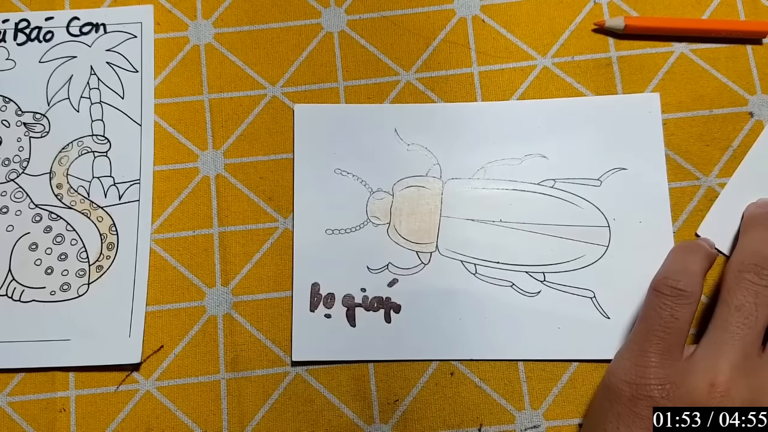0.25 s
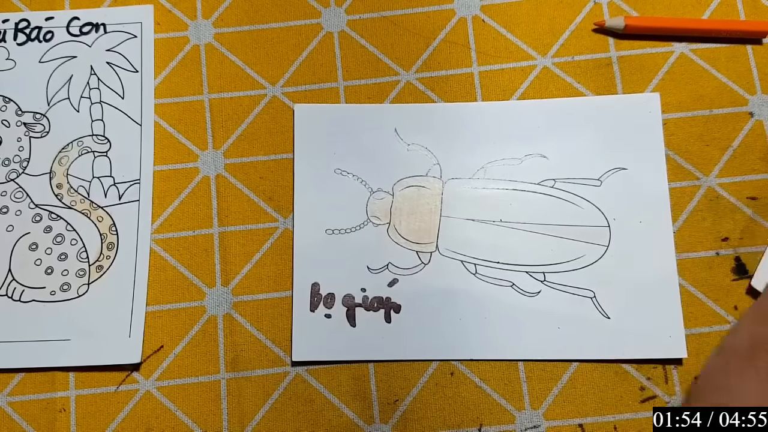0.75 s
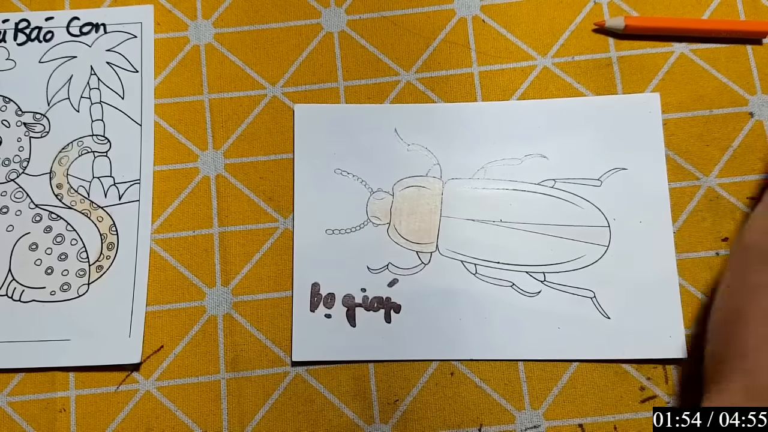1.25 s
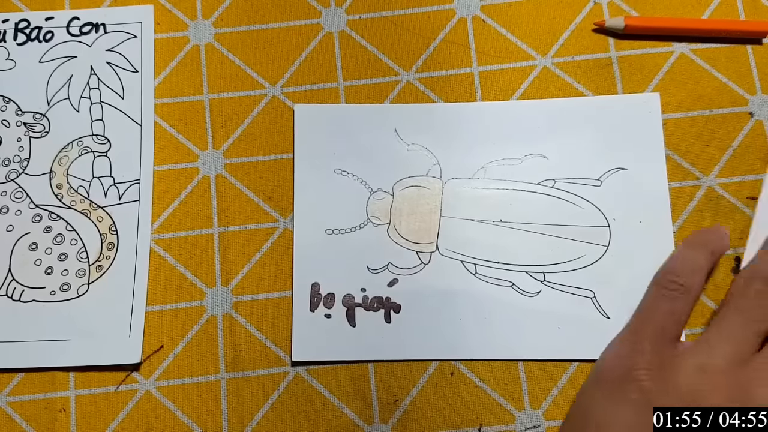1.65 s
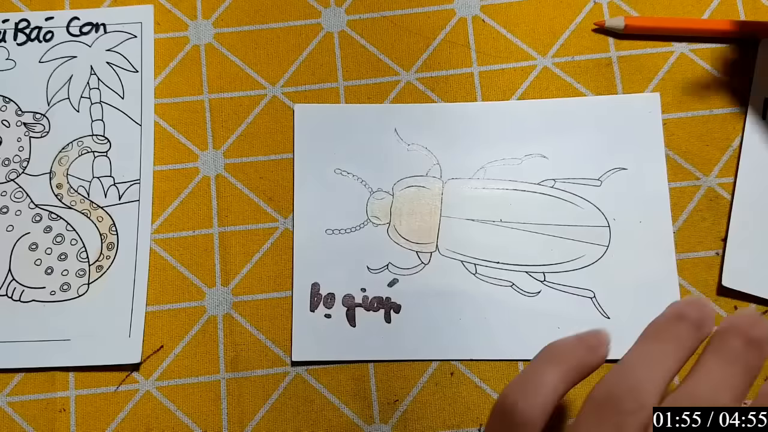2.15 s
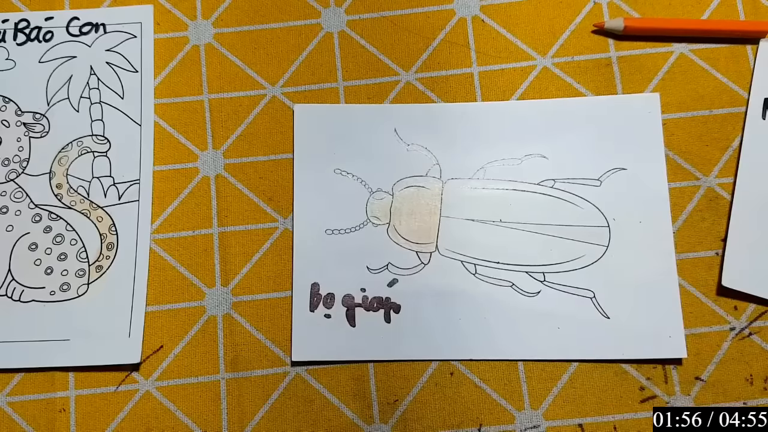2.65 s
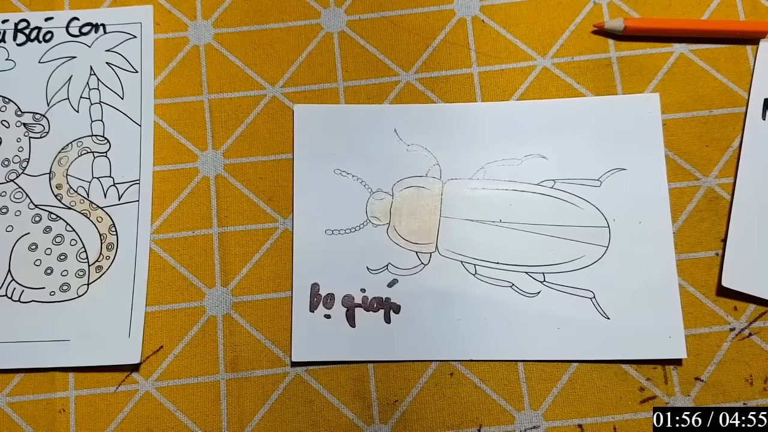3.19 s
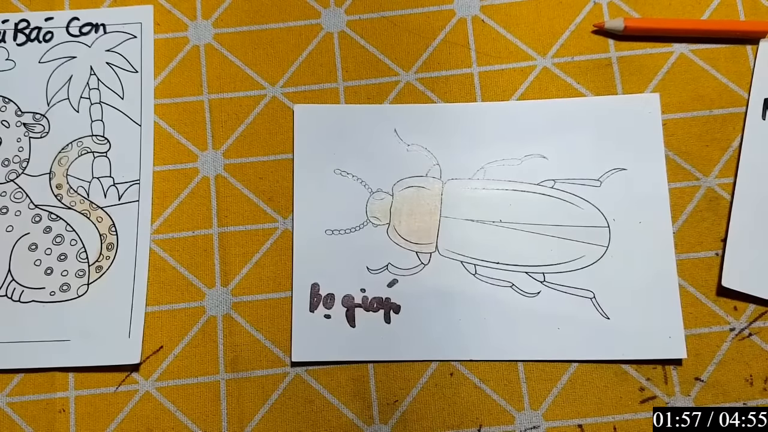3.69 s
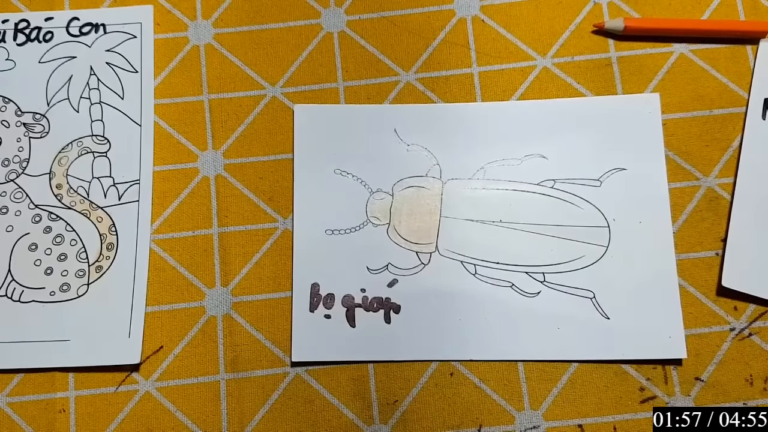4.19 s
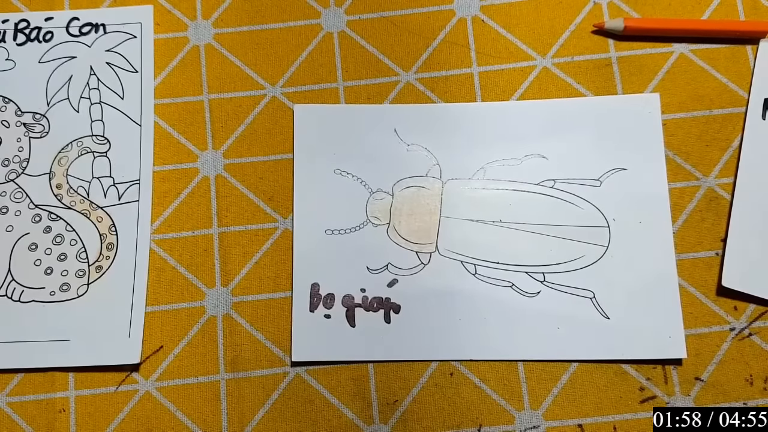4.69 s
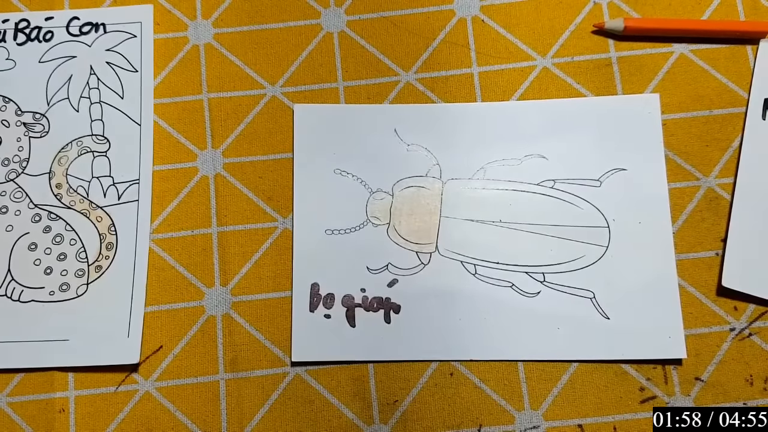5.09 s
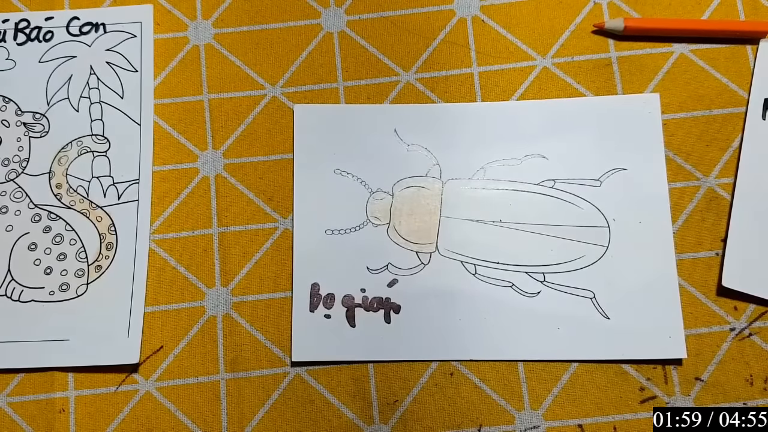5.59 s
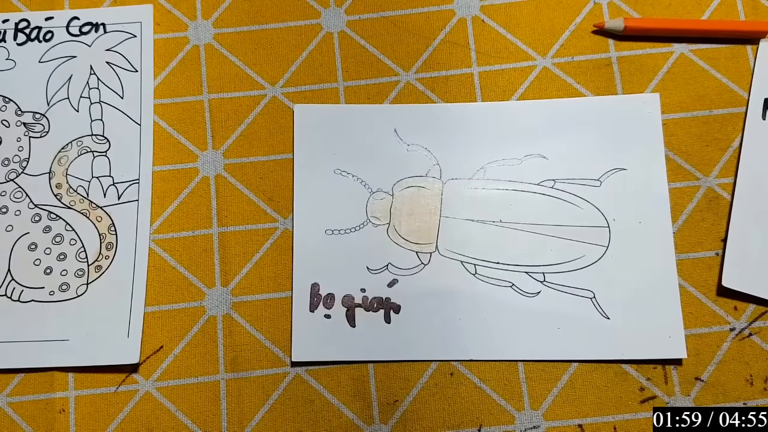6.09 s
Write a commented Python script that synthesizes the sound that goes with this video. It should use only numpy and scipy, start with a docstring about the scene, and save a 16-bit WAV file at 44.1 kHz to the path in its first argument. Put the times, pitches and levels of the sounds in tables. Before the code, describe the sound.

A close stereo microphone over a cloth-covered table in a bare, resonant room, with a low dull rush beneath. From 0 to 1.1 seconds, wood scrapes and groans faintly in a low hollow tone while paper swishes lightly on the right, with a snap and soft thump at 0.6 and clicks near 1.05. A small tick at 1.4, then near quiet. At 2.2 a crisp wooden clack, another at 2.3; around 2.6 to 2.8 a stronger hollow scrape and short groan with knocks. At 3.3 a deep soft thump. At 4.1 a hard, loud knock with thump and paper stroke, then calmer rubbing. From 5.2 knocks and scrapes crowd together, a loud paper sweep peaks at 5.7, and heavy clattering knocks land near 6.1. Abrupt tenth-second dropouts come at about 0.5, 1.75, 3.0, 4.25 and 5.5.

```python
"""Wood scrapes and groans as things are pushed aside, while paper hisses and snaps over a cloth-covered table.
The hand thumps the cloth, wooden things knock, and it is all heard close up in stereo in a bare room.
Rubbing is noise made of tiny slips, knocks and snaps are dying noise bursts, thumps are decaying tones,
and the groan is wavering sines. The sound drops out for a tenth of a second at a steady beat."""
import sys
import numpy as np
from scipy import signal
from scipy.fft import rfft, irfft, next_fast_len
from scipy.io import wavfile
from scipy.ndimage import map_coordinates

SR = 44100
rng = np.random.default_rng(int(sys.argv[2]) if len(sys.argv) > 2 else 0)


def put_to_file(sound):
    """Save the sound as 16-bit audio at rate SR, in the file named by the first command-line argument."""
    columns = np.atleast_2d(sound).T  # one column per channel
    safe = np.clip(columns, -1, 1)
    whole_steps = np.round(safe * 32767)
    wavfile.write(sys.argv[1], SR, whole_steps.astype(np.int16))


N = 279946

# things pushed over wood: peak_s, body_level_db, rise_s, fall_s, scrape_over_body_db
WOOD_DRAGS = [(.02, -47.5, 0.302, 0.33, 4.5), (.28, -37.5, .6, 0.57, -14), (.62, -45.5, 0.17, .3, -5),
              (.8, -48, .12, .12, -1.5), (1.07, -46, 0.25, 0.19, 2.5), (2.3, -47.5, 0.69, .6, -7),
              (2.62, -26, 0.07, 0.34, -3.5), (2.709, -25, 0.18, 0.3, -4.5), (3.1, -40, .3, 0.72, -7),
              (3.36, -35.5, 0.068, 0.38, -8.5), (3.87, -53.5, 0.19, 1, 10.5), (4.149, -30, 0.16, 0.31, 1),
              (4.38, -35, 0.24, 0.41, -1), (4.85, -43.5, 0.22, 0.21, 3.5), (5.27, -37.5, 0.31, 0.45, 3),
              (5.355, -27.5, 0.031, 0.43, 0), (5.648, -28.5, 0.19, 0.28, 5.5), (5.87, -30, 0.14, 0.24, 0.5),
              (6.2, -32, 0.22, 0.56, -0.5)]
# slow pushes under which the wood sings: peak_s, level_db, rise_s, fall_s
GROAN_PUSHES = [(.12, -39.5, 0.54, 0.32), (.32, -42.5, 0.29, 0.88), (2.6, -35.5, 0.087, 0.23),
                (2.73, -31, .15, .33)]
# hollow tones of slowly rubbed wood: pitch_hz, waver_hz, relative_level_db
HOLLOW_TONES = [(273, 12, 0.5), (375.5, 18, -6)]
# strokes of paper over cloth and paper: peak_s, level_db, rise_s, fall_s
PAPER_SLIDES = [(.29, -55.5, .08, .6), (.56, -43.5, 0.33, 0.3), (.72, -41, 0.14, .12),
                (.8, -35.5, 0.078, .09), (.94, -37.5, 0.065, .09), (1.07, -35, .12, 0.11),
                (1.55, -46, 0.32, 0.2), (2.23, -53, .04, .4), (2.77, -39.5, .38, .4), (3.3, -55, .9, 1.1),
                (3.86, -42.5, 0.14, .6), (4.09, -30.5, .18, 0.15), (4.53, -43, 0.51, 0.21),
                (4.84, -39.5, 0.18, 0.26), (5.13, -42, 0.16, 1.6), (5.35, -28.5, 0.023, 0.17),
                (5.67, -19.5, .17, 0.22), (5.955, -33, .05, 0.13), (6.19, -31.5, 0.1, 0.2)]
# presses of the arm that set the table shaking: peak_s, level_db, fall_s
ARM_PRESSES = [(.65, -51, .6), (.92, -50.5, .45), (2.7, -35.5, .4), (3.36, -34, 0.31), (4.13, -36, .3),
               (4.43, -43.5, .4), (4.87, -42, 0.28), (5.25, -35, 2.5), (5.89, -30.5, 0.42),
               (6.21, -31.5, .7)]
# decaying low or middle tones of hand and paper stack thumping the cloth; rows close together
# can belong to one blow: start_s, level_db, pitch_hz, t60_s
THUMP_TONES = [(.615, -26.5, 143, 0.052), (.776, -32.5, 67.7, 0.16), (1.054, -25, 213.5, 0.16),
               (2.204, -37, 221, 0.069), (3.324, -19, 177.3, 0.28), (3.328, -20.5, 268, 0.17),
               (3.452, -32.5, 199.7, .3), (4.107, -19, 245.3, 0.28), (4.114, -27, 56, .3),
               (4.121, -17.5, 162, 0.15), (4.191, -22, 302, .091), (4.833, -27, 169, 0.11),
               (5.158, -23, 105, 0.13), (5.201, -29.5, 175, 0.51), (5.39, -22, 172, 0.15),
               (5.861, -29.5, 241, 0.17), (6.128, -27.5, 185, 0.3), (6.13, -11, 507, 0.058)]
# paper edges snapping and light things clicking:
# start_s, level_db, ring_hz, ring_width_hz, bright_crack_db, t60_s, room_db, left_over_right_db
EDGE_SNAPS = [(.615, -17.5, 3740, 1794, -14, .0068, -19, -11),
              (1.026, -31.5, 4200, 4000, -5, .01, -10.5, 3.5),
              (1.069, -23.5, 8100, 4120, -9, 0.03, -12.5, -2),
              (1.0733, -19, 8700, 2970, 3, .012, -10.5, -6.5),
              (1.407, -33.5, 3140, 1500, -13.5, .008, -13, -4),
              (1.4136, -22, 3400, 2200, -7.5, 0.0069, -16, -6),
              (2.2033, -15.5, 8870, 1104, -11.5, 0.023, -14.5, 3.5),
              (2.3055, -21, 5260, 1100, -12.5, .014, -12, 2.5),
              (3.492, -38, 4000, 3960, -12.5, .022, -0.5, 1), (4.571, -33, 2360, 1000, -21, .04, -4, 2),
              (5.49, -32.5, 6980, 6040, -3.5, .048, -5, -2.5), (5.505, -22, 5000, 6130, -3.5, .02, -14, -4),
              (5.885, -25.5, 5920, 4940, -18, .015, -10, -.5),
              (5.952, -24.5, 8980, 5930, -7, 0.018, -12, 1), (6.0455, -9.5, 2190, 1770, -44, .012, 3, -2),
              (6.132, -18, 2220, 1516, -30.5, 0.027, 5, .5)]
# hard contacts on wood:
# start_s, level_db, low_body_db, dull_above_hz, own_ring_hz, own_ring_db, t60_s, left_over_right_db
HARD_KNOCKS = [(2.1992, -18, 5, 5000, 447, 5.5, 0.013, 2), (2.2033, -13.5, -0.5, 3570, 1100, -7, .03, 1),
               (2.2123, -20, -3, 3200, 2400, -0.5, 0.044, 4), (2.3056, -23, -2, 9000, 800, 5, .016, -5),
               (2.632, -24, -2, 3000, 520, 7.5, .03, 0.5), (2.697, -15.5, 6, 2500, 880, 0, 0.037, 7),
               (3.321, -32, 10, 1700, 302, 1, 0.042, 1.5), (3.455, -31, 1, 1500, 888, 10.5, 0.15, 1.5),
               (4.096, -5, 4, 12250, 704, 2, 0.0051, 0), (4.099, -7.5, 0.5, 7000, 688, 2, 0.016, 1),
               (4.111, -17, 0, 2950, 920, 12.5, 0.084, -2), (4.119, -19, -0.5, 2500, 318, 12.5, 0.05, 8.5),
               (5.198, -17, 3.5, 3000, 1790, 3.5, 0.028, -5.5), (5.21, -23.5, -4.5, 3000, 860, 7, .058, 7),
               (5.263, -24, -11, 8000, 855, 10, 0.11, -3.5), (5.341, -18.5, 1, 6060, 780, 6.5, 0.058, -2.5),
               (5.397, -15.5, -2, 5030, 770, 15.5, .024, -2), (5.863, -21.5, -18, 3000, 312, 13, .05, -5),
               (6.128, -12.5, 4.5, 4490, 489, 4, .055, 4.5), (6.1321, -5.5, 0, 7500, 1980, 3, .04, -3),
               (6.145, -10.5, -16.5, 6000, 2080, 4, 0.029, 7)]
# modes of the struck wood: pitch_hz, width_hz, relative_level_db
WOOD_MODES = [(211, 50, 4), (488, 160, 2), (795, 340, 1), (1360, 460, 4), (2000, 530, 2.5),
              (3480, 1800, -1.5), (8000, 6100, -7)]

# noise colours of paper hiss, hollow body, dry scrape, shaking table and room: frequency_hz, density_db (per Hz)
PAPER_COLOUR = [(500, -36.5), (1200, -15), (2500, -0.5), (4500, 2), (7000, -2), (9200, 0), (10300, -9),
                (13500, -6.5), (16000, -16)]
BODY_COLOUR = [(70, -31.5), (140, -1.5), (220, -0.5), (290, 1), (400, -5), (550, -5), (800, -7.5),
               (1100, -11.5), (2000, -38)]
SCRAPE_COLOUR = [(500, -18), (850, -4), (1300, -2), (2100, 0.5), (2800, -2.5), (4000, -10), (7000, -32.5),
                 (14000, -39.5)]
SHAKE_COLOUR = [(15, -7.5), (30, -14), (62, -1.5), (90, -7), (125, -8), (200, -20), (500, -70)]
ROOM_TONE_COLOUR = [(25, -11), (60, -1), (120, -2), (240, -4), (450, -13.5), (800, -25), (1150, -17),
                    (1320, -9), (1550, -19.5), (2600, -20.5), (5000, -23), (9300, -34.5), (10500, -35.5),
                    (16000, -42)]
# stereo width of sound spread by the room: frequency_hz, side_over_mid_db
STEREO_WIDTH = [(30, -16), (125, -13), (250, -10.5), (500, -6.5), (1000, -1), (12000, 1)]
# decay of the room: frequency_hz, t60_s
ROOM_DECAY = [(150, .55), (600, 0.66), (2200, 0.75), (5000, 0.72), (12000, 0.35)]
# the beat of the dropouts: first_s, period_s, length_s
DROPOUT_BEAT = (.4925, 1.2538, .1012)

SWELL_DB = 20  # the rise and fall times of a stroke each span this many dB
PRESS_RISE_S = 0.15
# floor between strokes, while the hands keep shifting
REST_HISS_DB, REST_BODY_DB, REST_SCRAPE_DB, REST_SHAKE_DB = -62.5, -55, -57.5, -53.5
KNOCK_ROOM_DB = -4
TOP_HZ = 16100  # nothing passes above this


def amp(db):
    """Decibels to gain."""
    return 10 ** (np.asarray(db) / 20)


def unit(x):
    """Scaled to rms 1."""
    return x / np.sqrt(np.mean(x ** 2) + 1e-20)


def along(points, hz):
    """A (frequency, value) curve read on a log frequency axis."""
    f, v = np.transpose(points)
    return np.interp(np.log(hz + 1), np.log(f + 1), v)


def curves(rows):
    """One value per sample for each column after the time."""
    s, *columns = np.transpose(rows)
    return [np.interp(np.arange(N) / SR, s, column) for column in columns]


def wobble(rate):
    """A smooth random curve with this many knots a second."""
    knots = rng.standard_normal(int(N * rate / SR) + 4)
    return map_coordinates(knots, [np.arange(N) * rate / SR])


def filtered(x, response):
    """x shaped by a complex response of frequency."""
    n = x.shape[-1]
    padded = next_fast_len(n + 2048, real=True)
    spectrum = rfft(x, padded) * response(np.fft.rfftfreq(padded, 1 / SR))
    return irfft(spectrum, padded)[..., :n]


def resonance(f, hz, width):
    """Causal response of one mode."""
    return 1j * f * width / (hz * hz - f * f + 1j * f * width)


def power_gain(response):
    """The rms gain of a response for white noise."""
    return np.sqrt(np.mean(np.abs(response(np.linspace(0, SR / 2, 2048))) ** 2))


def spread(pair):
    """Two unrelated signals to left and right: alike in the bass, unrelated in the treble."""
    def shares(f):
        angle = np.arctan(amp(along(STEREO_WIDTH, f)))
        return np.array([np.cos(angle), np.sin(angle)])
    mid, side = filtered(pair, shares)
    return np.array([mid + side, mid - side])


def panned(pair, pan_db):
    """Left made louder than right by pan_db."""
    left_gain = np.atleast_1d(amp(pan_db / 2))
    right_gain = np.atleast_1d(amp(-pan_db / 2))
    return pair * np.array([left_gain, right_gain])


def add(track, s, sound):
    """Mix a sound into the track at time s."""
    part = track[:, round(s * SR):][:, :sound.shape[-1]]
    part += sound[..., :part.shape[1]]


def strokes(rows, rest_db):
    """Gain of strokes that swell to a peak and die away; overlapping ones add in power."""
    t = np.arange(0, N, 32) / SR
    power = amp(rest_db) ** 2
    for peak_s, db, rise, fall in rows:
        away = np.maximum((peak_s - t) / rise, (t - peak_s) / fall)
        power = power + amp(db - SWELL_DB * away) ** 2
    return np.interp(np.arange(N) / SR, t, np.sqrt(power))


def friction(spectrum, grain_db, grain_rate):
    """Stereo rubbing of rms 1: tiny slips of uneven strength, coloured by what they shake."""
    slips = rng.standard_normal((2, N)) * amp(grain_db * wobble(grain_rate))
    return unit(filtered(spread(slips), lambda f: amp(along(spectrum, f))))


def burst(t60):
    """A tenth of a second holding one dying burst of stereo noise."""
    t = np.arange(SR // 10) / SR
    return spread(rng.standard_normal((2, len(t))) * amp(-60 * t / t60))


def in_room(x, room_db):
    """x followed by the room's answer, each frequency dying at its own speed."""
    hz, t, noise = signal.stft(rng.standard_normal((2, SR * 3 // 4)), SR, nperseg=256)
    decay = amp(-60 * t / along(ROOM_DECAY, hz)[:, None])
    tail = signal.istft(noise * decay, SR, nperseg=256)[1]
    tail *= 1 - np.exp(-np.arange(tail.shape[1]) / SR / 0.00054)  # soft onset
    response = amp(room_db) * spread(tail) / np.linalg.norm(tail[0])
    response[:, 0] += 1  # the direct sound
    return signal.fftconvolve(x, response, axes=1)


def near_walls(x, echo_db, count):
    """A few close surfaces return weak copies within 12 ms and ripple the spectrum."""
    delays = rng.uniform(.001, .012, count)
    strengths = unit(rng.standard_normal(count))
    out = x.copy()
    for s, gain in zip(delays, strengths):
        add(out, s, amp(echo_db) * gain * x)
    return out / np.sqrt(1 + count * amp(echo_db) ** 2)


def room_tone():
    """The steady, dull rush of the room: noise darkened to its colour."""
    rush = filtered(spread(rng.standard_normal((2, N))), lambda f: amp(along(ROOM_TONE_COLOUR, f)))
    return amp(-49.5) * unit(rush)


def dragging():
    """Each push on wood drives a hollow body and a dry scrape, both juddering together."""
    body_rows = [(s, db, rise, fall) for s, db, rise, fall, _ in WOOD_DRAGS]
    scrape_rows = [(s, db + scrape_db, rise, fall) for s, db, rise, fall, scrape_db in WOOD_DRAGS]
    push = strokes(body_rows, REST_BODY_DB)
    bite = strokes(scrape_rows, REST_SCRAPE_DB)
    judder = amp(1.85 * wobble(60))
    body = push * friction(BODY_COLOUR, grain_db=0.5, grain_rate=200)
    scrape = bite * friction(SCRAPE_COLOUR, grain_db=0.5, grain_rate=860)
    return panned(near_walls(judder * (body + scrape), echo_db=-20.5, count=5), 1.0)


def groan():
    """Slow rubbing keeps the wood's hollow modes sounding, unsteady in pitch and strength."""
    tones = np.zeros(N)
    for hz, waver_hz, db in HOLLOW_TONES:
        phase = 2 * np.pi * np.cumsum(hz + waver_hz * wobble(40)) / SR
        tones += amp(db + 4.3 * wobble(35)) * np.sin(phase)
    return strokes(GROAN_PUSHES, rest_db=-72.5) * unit(tones)


def paper():
    """Fibres catch and slip under the sheet; the hiss starts on the right and drifts towards the middle."""
    # start_s, left_over_right_db
    pan_db, = curves([(0, -4), (.7, -4), (1.5, -2.5), (2.5, -1), (6, -1)])
    hiss = friction(PAPER_COLOUR, grain_db=0.5, grain_rate=880)
    flutter = amp(1.8 * wobble(40))
    return panned(strokes(PAPER_SLIDES, REST_HISS_DB) * flutter * hiss, pan_db)


def table():
    """The table rumbles under each press of the arm, and thumps ring as decaying low or middle tones."""
    press_rows = [(s, db, PRESS_RISE_S, fall) for s, db, fall in ARM_PRESSES]
    shaking = strokes(press_rows, REST_SHAKE_DB)
    out = shaking * friction(SHAKE_COLOUR, grain_db=-0.3, grain_rate=30)
    t = np.arange(SR // 2) / SR
    soft_onset = 1 - np.exp(-t / 0.0012)
    for s, db, hz, t60 in THUMP_TONES:
        ring = np.sin(2 * np.pi * hz * t) * amp(db - 60 * t / t60) * soft_onset
        add(out, s, in_room(np.array([ring, ring]), room_db=-8.0))
    return panned(out, .9)


def snaps():
    """Each snap is a short noise burst through one steep-sided ring and a broad bright crack."""
    out = np.zeros((2, N))
    for s, db, hz, width, crack_db, t60, room_db, pan_db in EDGE_SNAPS:
        def colour(f):
            return resonance(f, hz, width) ** 2 + amp(crack_db) * resonance(f, 4500, 9800)
        snap = filtered(burst(t60), colour) / power_gain(colour)
        add(out, s, amp(db) * panned(in_room(snap, room_db), pan_db))
    return out


def wood_modes(f):
    """Response of the struck wood: neighbouring modes answer with opposite sign."""
    return sum((-1) ** k * amp(db) * resonance(f, hz, width)
               for k, (hz, width, db) in enumerate(WOOD_MODES))


def knocks():
    """Each hard contact rattles the wood's modes and one ring of its own, with its own weight and dullness."""
    out = np.zeros((2, N))
    for s, db, low_db, dull_hz, ring_hz, ring_db, t60, pan_db in HARD_KNOCKS:
        def colour(f):
            low_shelf = 1 + (amp(low_db) - 1) / (1 + 1j * f / 700)
            ring = 1 + amp(ring_db) * resonance(f, ring_hz, 0.2 * ring_hz)
            return wood_modes(f) * low_shelf * ring / (1 + 1j * f / dull_hz) ** 2
        blow = filtered(burst(t60), colour) / power_gain(colour)
        add(out, s, amp(db) * panned(in_room(blow, KNOCK_ROOM_DB), pan_db))
    return out


def scene():
    """Everything at the microphone."""
    return room_tone() + dragging() + groan() + paper() + table() + snaps() + knocks()


def record(dry):
    """The signal is muted briefly at a steady beat, rounded off near full scale and band-limited."""
    first, period, length = DROPOUT_BEAT
    live = (np.arange(N) / SR - first) % period > length
    x = dry * np.where(live, 1, amp(-58.5))
    x = x / (1 + (x / .93) ** 6) ** (1 / 6)  # soft ceiling at 0.93
    return filtered(x, lambda f: f < TOP_HZ)


dry = scene()
out = record(dry)
put_to_file(out)
```